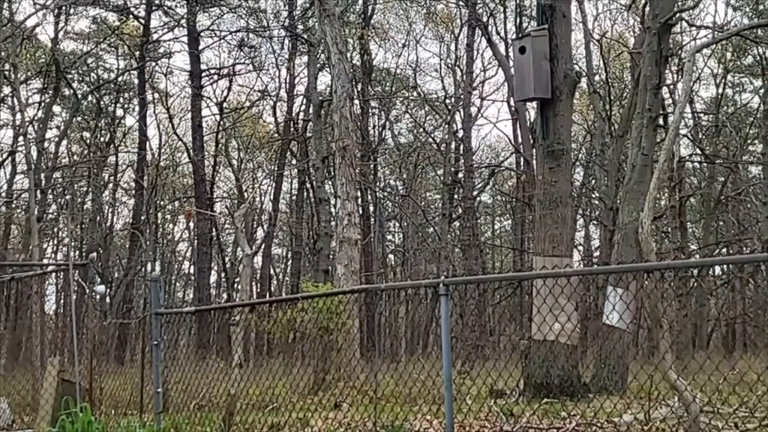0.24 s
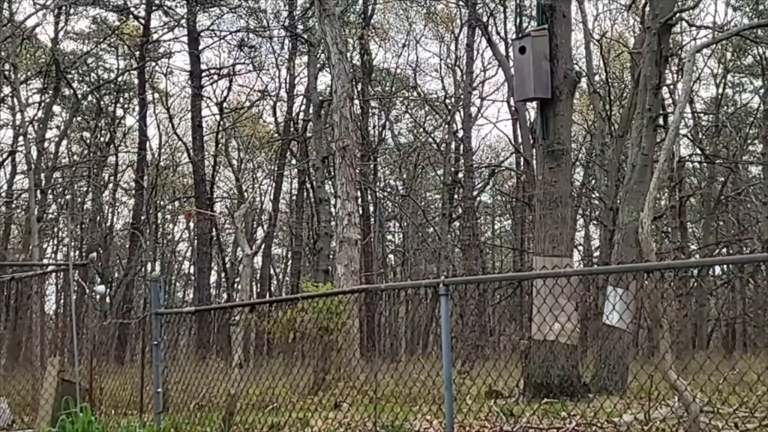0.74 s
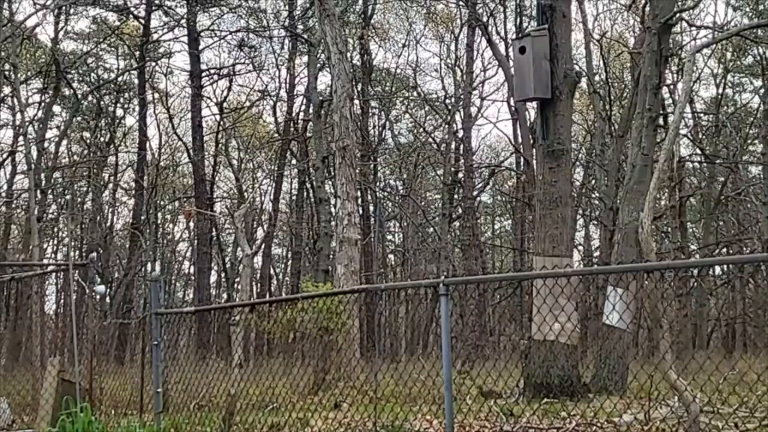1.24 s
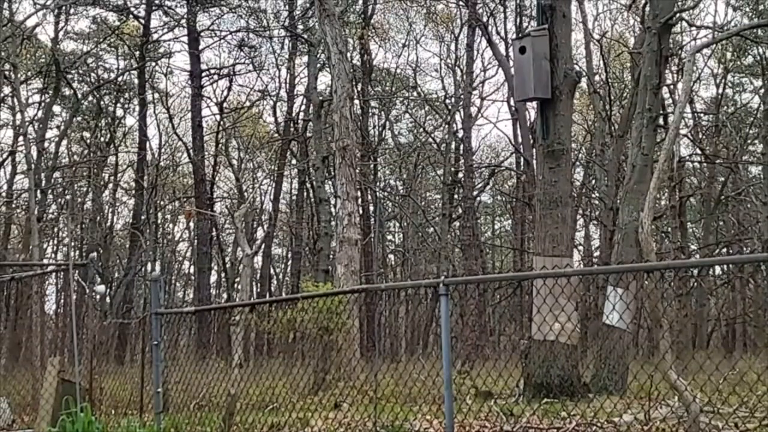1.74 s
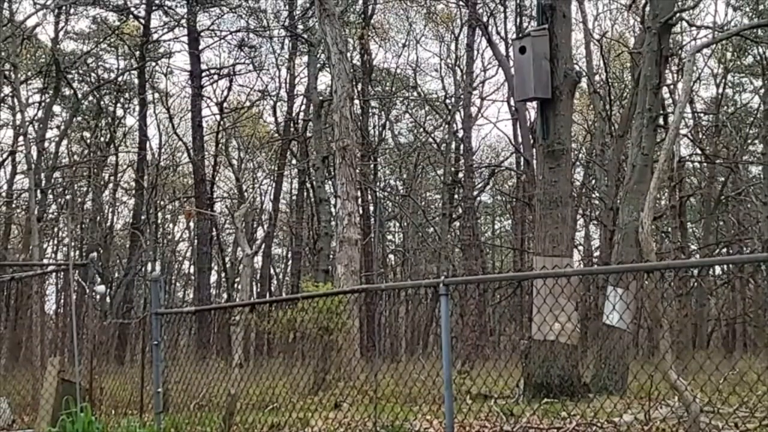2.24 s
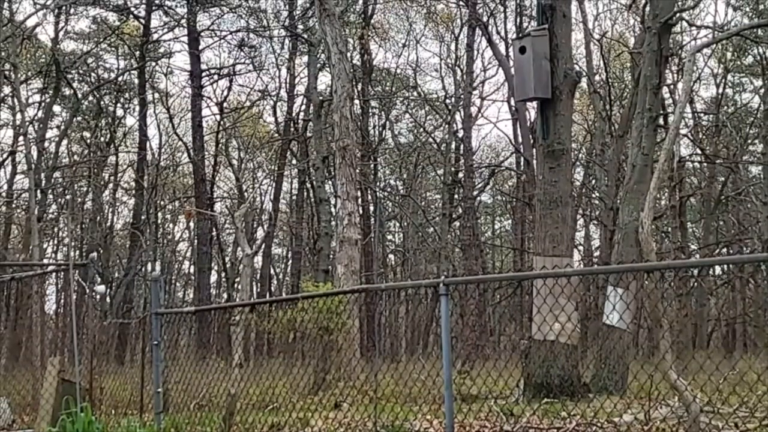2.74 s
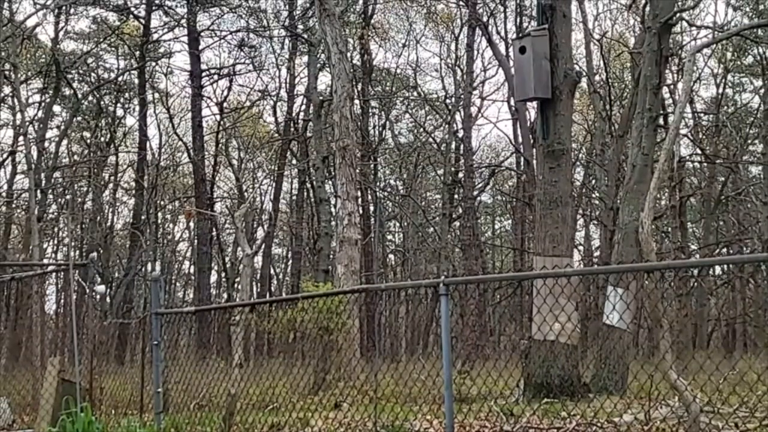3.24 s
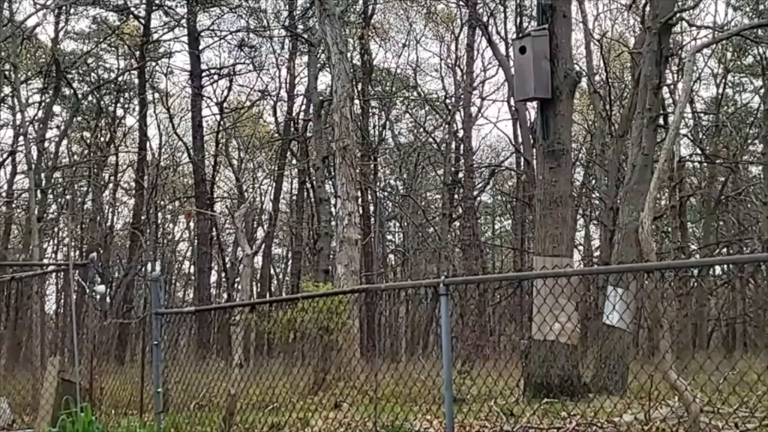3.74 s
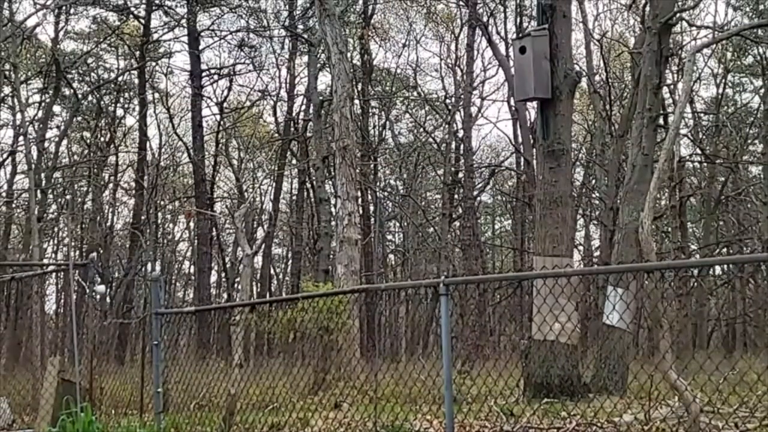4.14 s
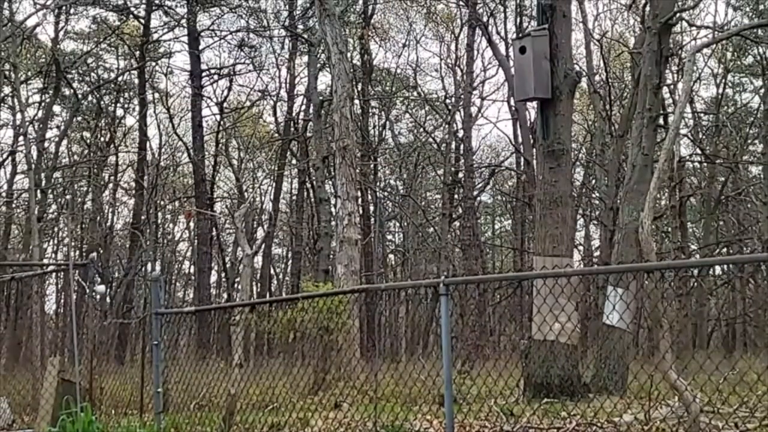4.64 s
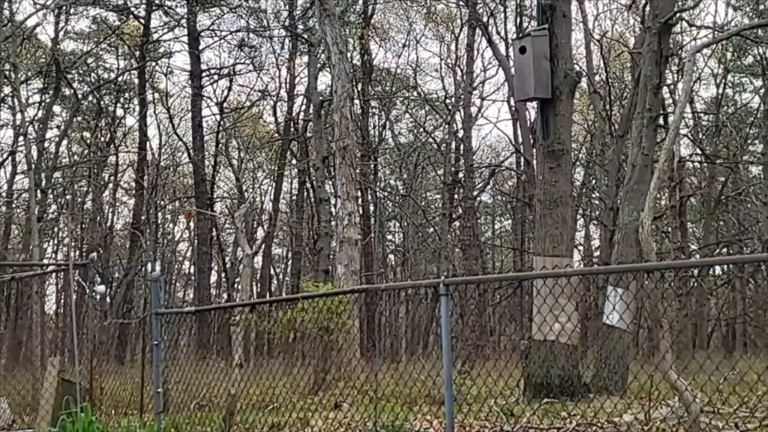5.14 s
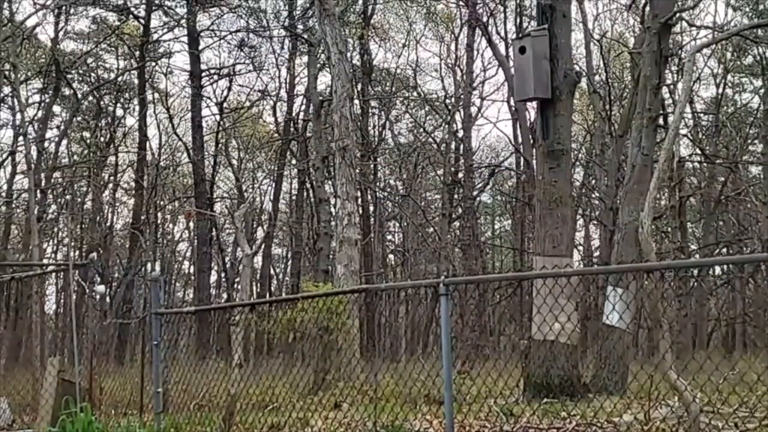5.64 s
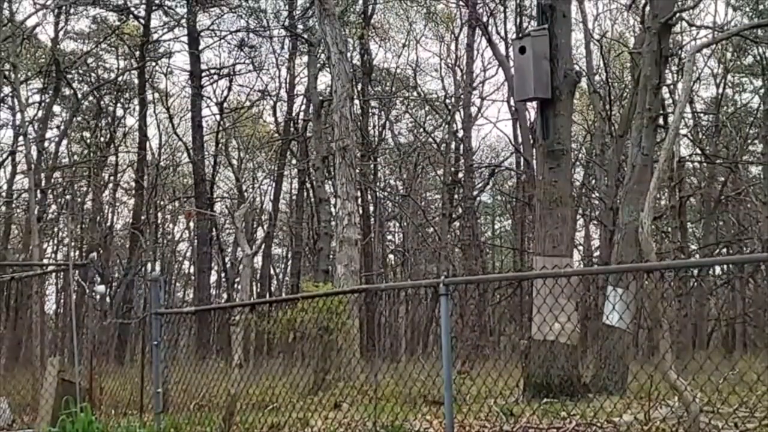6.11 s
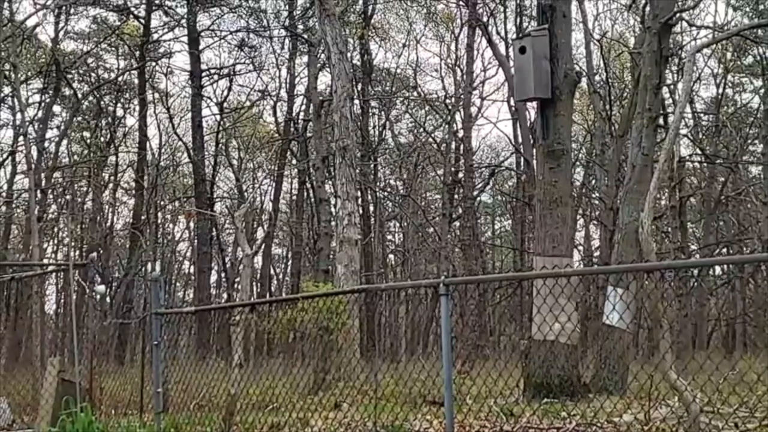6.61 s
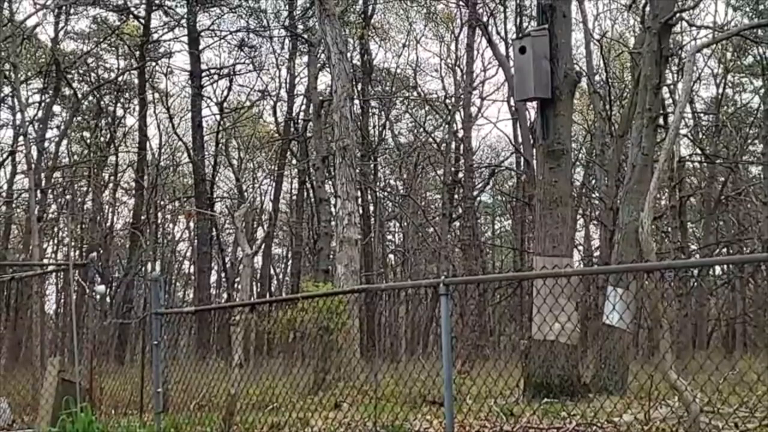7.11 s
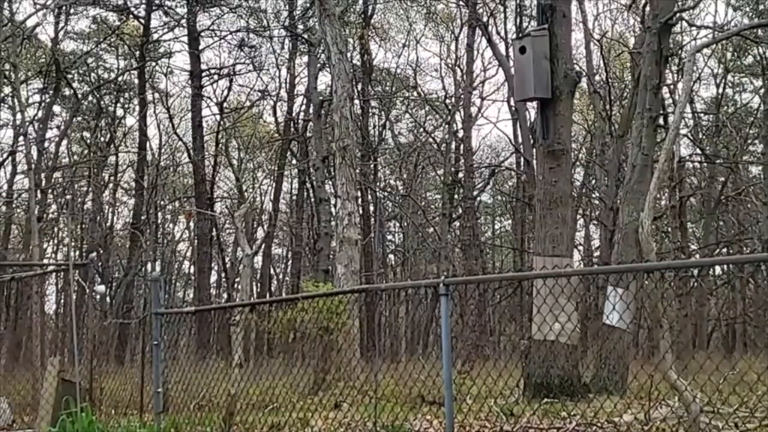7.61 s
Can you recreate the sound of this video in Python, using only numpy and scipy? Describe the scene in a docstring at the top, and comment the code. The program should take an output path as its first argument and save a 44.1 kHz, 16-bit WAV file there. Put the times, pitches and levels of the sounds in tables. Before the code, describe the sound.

In leafless woods a small bird repeats a quick tumbling phrase above distant road rumble; another trills, while fabric rustles and light ticks sound nearby.

```python
"""A wren sings over the rumble and drone of far traffic: two runs of a rolling five-note phrase.
Its notes are gliding sines, scattered into echo by tree trunks; a second bird trills, a third calls thinly.
Traffic is coloured noise plus engine harmonics and hums; a faint hiss of air carries swells of sizzle.
Close by, a small metal part clicks twice (noise burst and ring); cloth rustles in noise and tiny pings,
with light ticks and a knock. Four times the sound cuts out for an instant, with pops at the edges."""
import sys
import numpy as np
from scipy import signal
from scipy.fft import rfft, irfft, next_fast_len
from scipy.io import wavfile
from scipy.ndimage import uniform_filter1d, map_coordinates

SR = 44100
rng = np.random.default_rng(int(sys.argv[2]) if len(sys.argv) > 2 else 0)


def dump(signal):
    """Clip the signal to [-1, 1] and save it as 16-bit WAV at the path in sys.argv[1]."""
    limited = np.clip(np.atleast_2d(signal).T, -1, 1)
    pcm = np.round(limited * 32767).astype(np.int16)
    wavfile.write(sys.argv[1], SR, pcm)


N = 347061

# far road rumble, tyre roar: freq_hz, relative density_db
RUMBLE_SPECTRUM = [(13, -48), (25, -19.5), (40, -8), (59, 2), (72, 1.5), (92, -6), (120, -2.5), (142, -9),
                   (190, -28), (320, -120)]
ROAR_SPECTRUM = [(71, -30), (120, -3.5), (163, -6), (188, -8.5), (258, -8.5), (288, -12), (318, -11.5),
                 (431, -18.5), (475, -18.5), (927, -23), (1950, -46.5), (2200, -57), (2860, -66),
                 (4840, -120)]
# rumble: time_s, level_db before trim and wobble
RUMBLE_LEVEL = [(0.0, -47), (0.13, -41.5), (0.2, -48.5), (0.68, -46.5), (0.85, -50), (2.2, -51),
                (2.65, -51), (4.5, -51), (5.55, -48), (6.1, -52), (7.87, -52.5)]
RUMBLE_TRIM_DB = -1.5
# roar: mean level, shares of the engine's and the rumble's swell that it follows
ROAR_DB, ROAR_ENGINE_SHARE, ROAR_RUMBLE_SHARE = -57.5, 0.076, 0.25
# passing engine: time_s, reference drone level_db
DRONE_LEVEL = [(0.0, -62), (2.4, -66), (2.9, -55.5), (3.2, -58), (3.6, -52), (4.25, -48), (4.8, -54),
               (5.3, -46.5), (5.72, -42.5), (5.93, -54), (6.42, -59), (6.65, -54), (7.17, -50), (7.5, -61),
               (7.65, -51), (7.87, -52)]
# engine slowly loses speed: time_s, fundamental_hz before wobble
DRONE_PITCH = [(0, 157.8), (3.1, 156.9), (4.3, 155.2), (5.9, 155.1), (6.6, 152.8), (7.87, 152.1)]
# drone harmonics: multiple, level_db re drone
DRONE_HARMONICS = [(1, -2.4), (2, -25.5)]
# drone's third harmonic: time_s, level_db before wobble
THIRD_HARMONIC_LEVEL = [(2.6, -90), (4.4, -76.5), (5.3, -77), (5.68, -66.5), (6.05, -80), (6.42, -64.5),
                        (6.65, -81)]
# far machinery: centre_hz, mean level_db, share of the engine's swell
HUMS = [(68.8, -61, 0.17), (170.8, -66, 0.24), (263.2, -71.5, 0.54), (310.9, -75, 0.16)]

# hiss of the woods: freq_hz, relative density_db
AIR_SPECTRUM = [(880, -10.5), (1500, -3), (2010, -10), (2750, -11), (6060, -12.5), (7150, -9),
                (9400, -16.5), (13000, -13.5), (15500, -23.5)]
# sizzle swells: peak_s, rise_s, fall_s, peak_db before flicker
SIZZLE_SWELLS = [(1.7, 0.36, .5, -90), (2.55, 0.35, 0.19, -84), (2.79, 0.043, .06, -83),
                 (4.15, 0.14, 0.49, -87.5), (4.68, 0.12, 0.23, -82.5), (7.44, 0.034, 0.073, -81.5),
                 (7.86, 0.17, .1, -73)]
# all swells: level one rise before or one fall after the peak; exponent rounding the peak
SWELL_EDGE_DB, SWELL_SHAPE = -16.5, 1.9

# wren phrases: start_s, pitch_ratio, level_db, start_offset_db (fades out), low_whistle_accent_db
PHRASES = [(-.084, 0.98, -64.5, -10.5, -4.5), (.379, 1.003, -63.5, 0.5, 2), (.85, 1.004, -63, 1.5, 0.5),
           (1.321, 0.99, -62.5, 1.5, 1), (5.15, 1, -64.5, -16, 1), (5.615, 1.003, -63, -1, 0),
           (6.079, 0.997, -62, 1.5, -1.5), (6.547, 1, -63, 3, 1)]
WARM_UP_S = 0.095  # time constant of that fade
# wren notes: time_s into phrase, pitch_hz before ratio, relative level_db
SWEEP = [(.001, 4250, -8), (.009, 5100, -6), (.018, 5480, -3), (.026, 5350, -11), (.04, 4850, -11),
         (.052, 4550, -3), (.072, 4030, 0), (.084, 3680, -9), (.097, 3420, -2), (.112, 3150, -7)]
HIGH_WHISTLE = [(.108, 3560, -12), (.12, 3220, -10), (.132, 3480, -9), (.143, 3250, -11), (.153, 3480, -10),
                (.159, 3600, 3), (.172, 3620, 4), (.18, 3590, -8)]
LOW_WHISTLE = [(.2, 2670, -17), (.219, 2700, -7), (.233, 2725, -1), (.246, 2735, -8), (.256, 2745, 1),
               (.274, 2745, 3), (.284, 2700, -10)]
BURR = [(.278, 3420, -8), (.291, 3100, -4), (.303, 2900, 0), (.312, 3150, -1), (.32, 2980, -2),
        (.334, 2800, -9)]
SLUR = [(.339, 2590, -6), (.349, 2510, 3), (.362, 2440, 2), (.378, 2350, -2), (.405, 2270, -1),
        (.435, 2225, -1), (.462, 2190, -7)]
# note trims re phrase
SWEEP_DB, HIGH_DB, LOW_DB, BURR_DB, SLUR_DB = -1, -1.2, -1, -1, -2.5

# deep woods echo: freq_hz, t60_s
WOODS_DECAY = [(500, 0.15), (2500, 1), (5000, 0.77), (8000, 0.95), (14000, 0.95)]
ECHO_BUILD_S = .022  # long echo gathers as more trunks answer
TRUNK_LUMPS_DB, TRUNK_LUMPS_PER_S = 2, 110  # unevenness of the tail

# metal clicks: start_s, level_db
CLICKS = [(.359, -49), (0.465, -43)]
# click burst: freq_hz, relative density_db
CLICK_SPECTRUM = [(800, -28), (2200, -15), (3400, -10.5), (4100, -2.5), (5400, 1.5), (6400, -7),
                  (7400, -2.5), (9500, -9), (12200, -7), (14200, -5), (14700, -48)]
# click ring: freq_hz, mean relative level_db, t60_s
METAL_RING = [(4900, -37, 0.1), (5300, -26, 0.13), (5300, -23, 0.15), (7250, -7, 0.083), (7250, -15, 0.12),
              (7900, -7, 0.1), (14100, -32, 0.29)]

# thin calls, one list each: time_s, pitch_hz before ratio, level_db
THIN_CALLS = [
    [(.73, 6850, -83), (.755, 6930, -79), (.775, 6600, -89)],
    [(1.41, 7670, -77), (1.437, 8020, -75), (1.475, 7600, -74), (1.497, 7200, -75)],
    [(3.408, 7660, -78), (3.432, 6940, -73), (3.455, 6400, -77)],
    [(5.825, 7050, -76), (5.86, 7500, -70), (5.905, 7000, -69)],
    [(6.655, 7450, -78), (6.672, 7000, -62), (6.692, 6480, -80)],
]

# cloth friction: freq_hz, relative density_db
CLOTH_SPECTRUM = [(500, 5), (1200, 6), (2500, 2), (4000, 6.5), (5500, 4.5), (7200, 7.5), (8600, -5),
                  (11000, -0.5), (13200, 1.5), (14200, -2), (14700, -57)]
# cloth movements: peak_s, rise_s, fall_s, peak_db
RUBS = [(4.66, 0.11, .15, -83), (4.92, 0.13, 0.25, -74), (5.47, 0.37, 0.22, -70.5), (5.95, 0.53, 0.53, -65),
        (6.95, 0.23, 0.14, -73), (7.09, 0.027, 0.039, -70), (7.85, 0.16, .1, -78)]
# scuffs: centre_s, length_s, centre_hz, level_db
SCUFFS = [(0.833, 0.018, 2930, -63.5), (4.221, 0.058, 4050, -75), (4.54, 0.034, 7500, -73),
          (4.938, .15, 3920, -69.5), (7.467, 0.083, 3480, -85.5), (7.641, 0.07, 6700, -77.5),
          (4.77, 0.2, 13000, -83), (4.876, .04, 12900, -73), (5.46, .03, 13000, -69),
          (5.52, .06, 13000, -74), (5.762, 0.059, 12400, -62), (6.052, 0.015, 6260, -64.5),
          (6.827, 0.011, 9700, -71), (7.088, 0.081, 13200, -73)]
CATCH_DB, SURGE_DB = 1.6, 1.4  # unevenness: single catches, short surges
# snagging fibres: rate, level re sliding noise, decay time constant
CRACKLES_PER_S, CRACKLE_DB, CRACKLE_DECAY_S = 900, -4.5, .00015
# fibre pings: lowest_hz, highest_hz
CRACKLE_RANGE = (1500, 13000)

# trill, slow and uneven, then quicker and fuller: start_s, pitch_ratio, level_db
TRILL = [(1.015, .97, -76), (1.174, 0.92, -74.5), (1.345, .97, -81), (1.513, 0.99, -73), (1.667, 0.98, -72),
         (1.831, 0.96, -75), (1.987, 1.02, -74.5), (2.127, 1.015, -70.5), (2.282, .99, -71),
         (2.431, 0.98, -70), (2.582, 1.014, -70), (2.738, 1.014, -68), (2.889, .99, -71)]
# one trill note: time_s into note, pitch_hz before ratio, relative level_db
TRILL_NOTE = [(0, 5800, -10), (.007, 5450, -1), (.014, 5100, 1), (.025, 4820, 0), (.036, 4580, -1),
              (.046, 4200, -9)]

# light contacts: start_s, knock_db, snap_db
TICKS = [(4.529, -63, -64.5), (4.854, -89, -66), (5.016, -78, -67), (5.445, -50.5, -57.5),
         (5.458, -71, -57), (5.675, -77, -54), (5.751, -49, -51.5), (5.934, -47.5, -64),
         (5.943, -43.5, -58), (6.008, -58, -59), (6.827, -59.5, -58.5), (6.856, -70, -69),
         (6.887, -66, -70), (6.921, -69, -58), (6.935, -59, -65), (6.999, -76, -64.5), (7.038, -76, -59),
         (7.259, -78, -76)]
# knock: freq_hz, relative density_db
KNOCK_SPECTRUM = [(300, -15), (550, 11), (750, 3), (1100, 1), (1500, -2.5), (2000, -6), (2500, -16),
                  (6000, -41)]
# ring of the hardest contact: start_s, freq_hz, level_db, t60_s
THUNK = (5.9432, 800, -34, .02)

# dropouts: start_s, end_s, first_pop_db, second_pop_db
DROPOUTS = [(.239, .2543, -48, -46), (2.2443, 2.2543, -56, -62), (4.2496, 4.2543, -60, -41),
            (7.2363, 7.2543, -64, -61)]
TOP_HZ = 15650  # band limit


def amp(db):
    """Decibels to gain."""
    return 10 ** (np.asarray(db) / 20)


def unit(x):
    """Scale to rms 1."""
    return x / np.sqrt(np.mean(x ** 2) + 1e-20)


def along(points, hz):
    """Read (freq_hz, value) points on a log frequency axis."""
    freq_hz, values = np.transpose(points)
    return np.interp(np.log(hz + 1), np.log(freq_hz + 1), values)


def curves(rows):
    """One value per sample for each column after the time."""
    time_s, *columns = np.transpose(rows)
    t = np.arange(N) / SR
    return [np.interp(t, time_s, column) for column in columns]


def wobble(rate, size=N):
    """Smooth random curve, rate knots a second."""
    knots = rng.standard_normal(int(size * rate / SR) + 4)
    return map_coordinates(knots, [np.arange(size) * rate / SR])


def filtered(x, response):
    """Multiply the spectrum of x by response(hz)."""
    m = next_fast_len(len(x) + 8192)
    spectrum = rfft(x, m) * response(np.fft.rfftfreq(m, 1 / SR))
    return irfft(spectrum, m)[:len(x)]


def noise(spectrum, size=N):
    """Coloured noise of rms 1."""
    white = rng.standard_normal(size)
    return unit(filtered(white, lambda hz: amp(along(spectrum, hz))))


def add(track, s, sound):
    """Mix a sound into the track from time s, cut at the track's ends."""
    start = round(s * SR)
    sound = sound[max(-start, 0):]
    place = track[max(start, 0):][:len(sound)]
    place += sound[:len(place)]


def swells(rows):
    """Gain of smooth swells, each with its own rise and fall, summed in power."""
    t = np.arange(N) / SR
    gains = []
    for peak_s, rise_s, fall_s, db in rows:
        distance = np.maximum((peak_s - t) / rise_s, (t - peak_s) / fall_s)
        gains.append(amp(db + SWELL_EDGE_DB * distance ** SWELL_SHAPE))
    return np.linalg.norm(gains, axis=0)


def woods(x, direct_db, near_db, near_t60, trunk_db=-6):
    """Direct sound, one big trunk, quick scatter and the deep woods' tail share the sound's energy."""
    hz, t, z = signal.stft(rng.standard_normal(SR), SR, nperseg=256)
    deep = amp(-60 * t / along(WOODS_DECAY, hz)[:, None]) * (1 - np.exp(-t / ECHO_BUILD_S))
    near = amp(near_db - 60 * t / near_t60)
    tail = signal.istft(z * (deep + near), SR, nperseg=256)[1]
    # groups of trunks answer in clumps
    tail = tail * amp(TRUNK_LUMPS_DB * wobble(TRUNK_LUMPS_PER_S, size=len(tail)))
    paths = tail / np.linalg.norm(tail)
    paths[0] += amp(direct_db)
    trunk_delay_s = rng.uniform(.02, .024)
    paths[round(SR * trunk_delay_s)] += amp(direct_db + trunk_db)
    heard = signal.fftconvolve(x, paths)
    return heard * np.linalg.norm(x) / np.linalg.norm(heard)


def whistle(shape, ratio, waver, overtone_db=-36):
    """One bird note: a gliding sine, unsteady in pitch and strength, with a weak octave."""
    s, hz, db = np.transpose(shape)
    t = np.arange(s[0], max(s[-1], s[0] + .01), 1 / SR)
    pitch_hz = ratio * np.interp(t, s, hz) * (1 + waver * wobble(250, size=SR // 6)[:len(t)])
    phase = 2 * np.pi * np.cumsum(pitch_hz) / SR
    flutter_db = 2.2 * wobble(110, size=SR // 6)[:len(t)]
    swell = amp(np.interp(t, s, db) + flutter_db) * signal.windows.tukey(len(t), .15)
    tone = np.sin(phase) + amp(overtone_db) * np.sin(2 * phase)
    return np.sqrt(2) * swell * tone


def traffic():
    """Rumble and tyre roar as noise; an engine's harmonics swell and sink, roar and hums partly with them."""
    rumble_db, = curves(RUMBLE_LEVEL)
    drone_db, = curves(DRONE_LEVEL)
    third_db, = curves(THIRD_HARMONIC_LEVEL)
    drone_hz, = curves(DRONE_PITCH)
    engine_swell_db = drone_db - drone_db.mean()
    rumble_swell_db = rumble_db - rumble_db.mean()

    rumble = amp(rumble_db + RUMBLE_TRIM_DB + 1.0 * wobble(5)) * noise(RUMBLE_SPECTRUM)
    roar_db = ROAR_DB + ROAR_ENGINE_SHARE * engine_swell_db + ROAR_RUMBLE_SHARE * rumble_swell_db
    roar = amp(roar_db + 0.73 * wobble(5)) * noise(ROAR_SPECTRUM)

    phase = 2 * np.pi * np.cumsum(drone_hz * (1 + 0.004 * wobble(12))) / SR
    drone = amp(third_db + 1.3 * wobble(7)) * np.sin(3 * phase)
    for multiple, db in DRONE_HARMONICS:
        drone += amp(drone_db + db + .6 * wobble(5.4)) * np.sin(multiple * phase)

    hum = np.zeros(N)
    for hz, db, share in HUMS:
        hum_phase = 2 * np.pi * np.cumsum(hz + 2 * wobble(6)) / SR
        hum += amp(db + share * engine_swell_db + 2.2 * wobble(4)) * np.sin(hum_phase)
    return rumble + roar + np.sqrt(2) * (drone + hum)


def air():
    """Faint high hiss of the open woods, with a sizzle near 7 kHz that comes and goes."""
    sizzle_noise = noise([(5000, -25), (6400, -10), (7400, -11.0), (8600, -27)])  # freq_hz, density_db
    sizzle = swells(SIZZLE_SWELLS) * amp(3.1 * wobble(25)) * sizzle_noise
    return amp(-83.5) * noise(AIR_SPECTRUM) + sizzle


def wren():
    """Phrases step down: arched sweep, high whistle, low whistle, short burr, falling slur."""
    song = np.zeros(N)
    for start, ratio, level_db, soft_db, accent_db in PHRASES:
        # sweep comes straight and off a big trunk; burr arrives mostly as scatter
        sweep = woods(whistle(SWEEP, ratio, waver=.014),
                      direct_db=-5, near_db=-10, near_t60=.25, trunk_db=-2)
        high = woods(whistle(HIGH_WHISTLE, ratio, waver=.01),
                     direct_db=-.5, near_db=-12, near_t60=.15, trunk_db=-12)
        low = woods(whistle(LOW_WHISTLE, ratio, waver=.007),
                    direct_db=.5, near_db=-12, near_t60=.085, trunk_db=-18)
        burr = woods(whistle(BURR, ratio, waver=.025),
                     direct_db=-4, near_db=-2, near_t60=.2)
        slur = woods(whistle(SLUR, ratio, waver=.01),
                     direct_db=-2, near_db=-7, near_t60=.24, trunk_db=-10)
        notes = [(SWEEP, SWEEP_DB, sweep), (HIGH_WHISTLE, HIGH_DB, high),
                 (LOW_WHISTLE, LOW_DB + accent_db, low), (BURR, BURR_DB, burr), (SLUR, SLUR_DB, slur)]
        for shape, db, note in notes:
            sung_s = shape[0][0]
            warm_up_db = soft_db * np.exp(-sung_s / WARM_UP_S)
            add(song, start + sung_s, amp(level_db + db + warm_up_db) * note)
    return song


def clicks():
    """A small metal part snaps twice: a bright, spiky noise burst and a thin ring of decaying modes."""
    track, t = np.zeros(N), np.arange(SR // 2) / SR
    onset = 1 - np.exp(-(t / 0.0038) ** 2)
    for s, db in CLICKS:
        chatter = unit(amp(1.8 * wobble(1500, size=len(t))))
        decay = amp(6.5 - 60 * t / 0.05) + amp(-15.5 - 60 * t / 0.28)
        burst = chatter * noise(CLICK_SPECTRUM, size=len(t)) * decay
        ring = np.zeros(len(t))
        for hz, level_db, t60 in METAL_RING:
            ring += amp(level_db + rng.normal(0, 2) - 60 * t / t60) * np.sin(2 * np.pi * hz * t)
        add(track, s, amp(db) * (burst + ring) * onset)
    return track


def thin_calls():
    """A nearer bird slips in high, thin calls: gliding sines with little echo."""
    song = np.zeros(N)
    for call in THIN_CALLS:
        note = whistle(call, 0.99, waver=0.004, overtone_db=-44)
        add(song, call[0][0], woods(note, direct_db=4, near_db=9, near_t60=0.16, trunk_db=-25))
    return song


def crackle():
    """Single fibres snag: dense tiny pings of uneven size, each at its own pitch."""
    track, t = np.zeros(N), np.arange(SR // 200) / SR
    for when, pitch, size in rng.random((int(CRACKLES_PER_S * N / SR), 3)):
        hz = np.interp(pitch, [0, 1], CRACKLE_RANGE)
        ping = np.exp(-t / CRACKLE_DECAY_S) * np.sin(2 * np.pi * hz * t)
        add(track, when * N / SR, np.log(1 - size) * ping)  # exponentially spread sizes
    return unit(filtered(track, lambda hz: amp(along(CLOTH_SPECTRUM, hz))))


def rustle():
    """Cloth slides in tiny catches, fibres snag, and now and then it scuffs with a narrow swish."""
    catches = unit(amp(CATCH_DB * wobble(450) + SURGE_DB * wobble(60)))
    friction = unit(noise(CLOTH_SPECTRUM) + amp(CRACKLE_DB) * crackle())
    cloth = swells(RUBS) * catches * friction
    for s, length_s, centre_hz, db in SCUFFS:
        white = rng.standard_normal(SR // 2)
        swish = unit(filtered(white, lambda hz: 1 / (1 + ((hz - centre_hz) / 1000) ** 2) ** 2))
        size = int(length_s * SR)
        add(cloth, s - length_s / 2, amp(db) * np.hanning(size) * swish[:size])
    return cloth


def triller():
    """Short hooked down-slurs, echoing, that quicken a little and grow higher and louder overall."""
    song = np.zeros(N)
    for s, ratio, db in TRILL:
        note = amp(db) * whistle(TRILL_NOTE, ratio, waver=.012, overtone_db=-28.0)
        add(song, s, woods(note, direct_db=-3, near_db=4, near_t60=0.36, trunk_db=-12))
    return song


def ticks():
    """Light contacts: dull knock and bright snap in varying shares, echoed; the hardest also rings."""
    track, t = np.zeros(N), np.arange(SR // 8) / SR
    for s, knock_db, snap_db in TICKS:
        knock = amp(knock_db - 60 * t / .03) * noise(KNOCK_SPECTRUM, size=len(t))
        snap = amp(snap_db - 60 * t / .02) * noise(CLOTH_SPECTRUM, size=len(t))
        add(track, s, knock + snap)
    heard = woods(track, direct_db=-3.0, near_db=14, near_t60=0.14, trunk_db=-18)[:N]
    s, hz, db, t60 = THUNK
    ring = amp(db - 60 * t / t60) * (1 - np.exp(-t / 0.0013)) * np.sin(2 * np.pi * hz * t)
    add(heard, s, ring)
    return heard


def scene():
    """Traffic beyond, birds in the trees, small noises close by."""
    distant = traffic() + air()
    birds = wren() + thin_calls() + triller()
    close = clicks() + rustle() + ticks()
    return (distant + birds + close)[None]


def record(dry):
    """Sound cuts out for milliseconds, a decaying pop at each edge; nothing passes above the band limit."""
    t = np.arange(N) / SR
    sound = dry[0].copy()
    pop = np.exp(-t / .001)
    for start, end, first_db, second_db in DROPOUTS:
        gate = ((t < start) | (t > end)).astype(float)
        sound *= uniform_filter1d(gate, size=32)  # softened edges
        add(sound, start, -amp(first_db) * pop)
        add(sound, end, amp(second_db) * pop)
    return filtered(sound, lambda hz: hz < TOP_HZ)[None]


dry = scene()
out = record(dry)
dump(out)
```